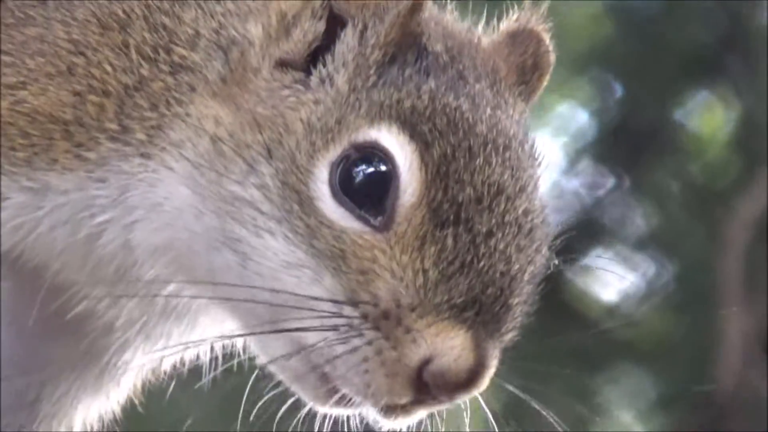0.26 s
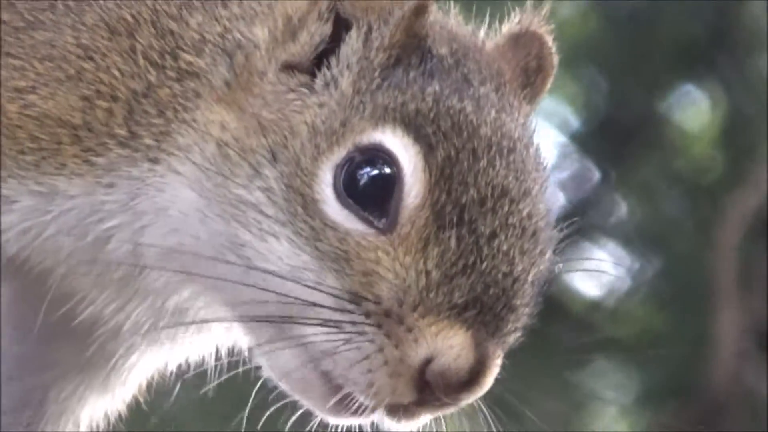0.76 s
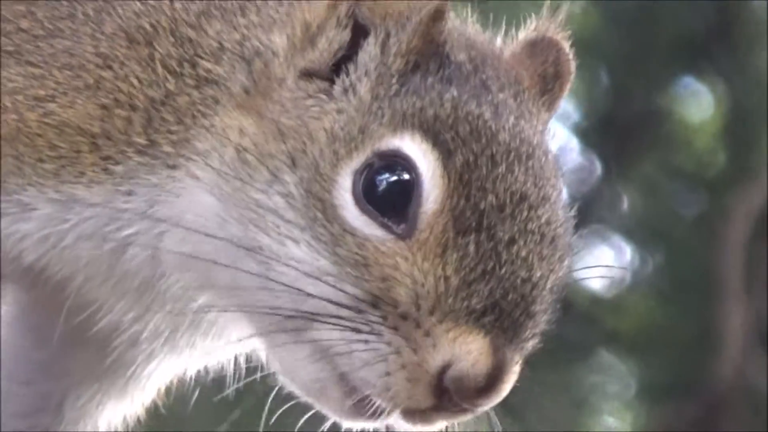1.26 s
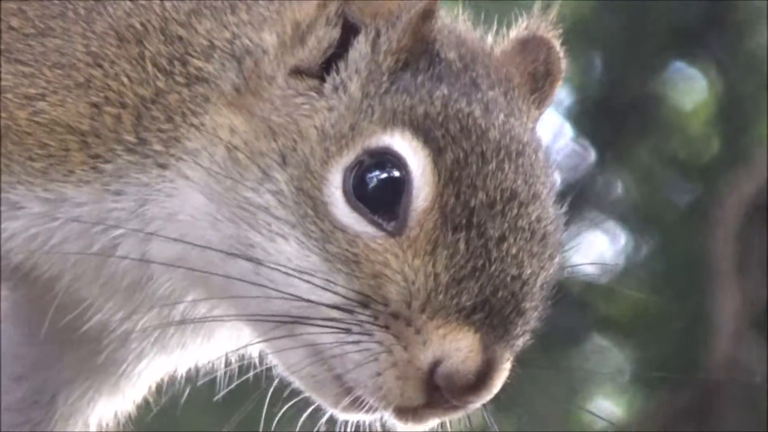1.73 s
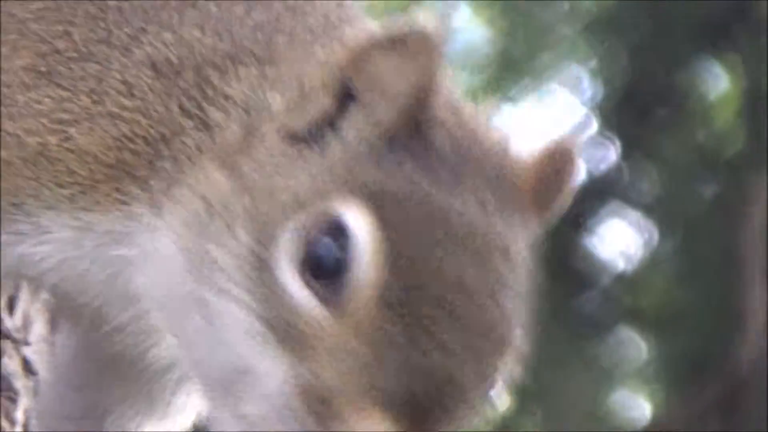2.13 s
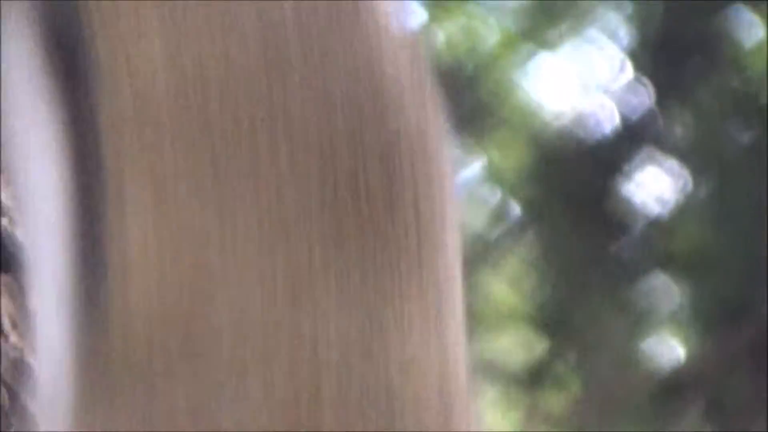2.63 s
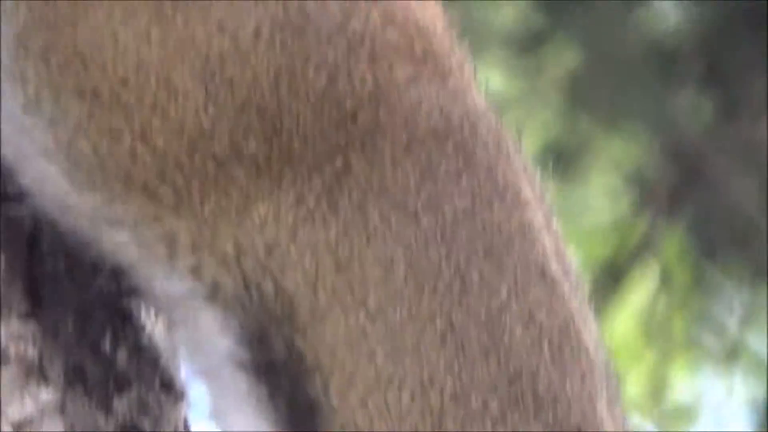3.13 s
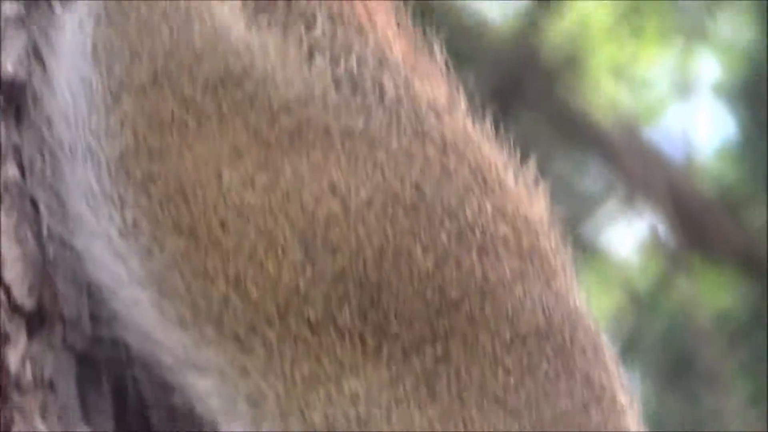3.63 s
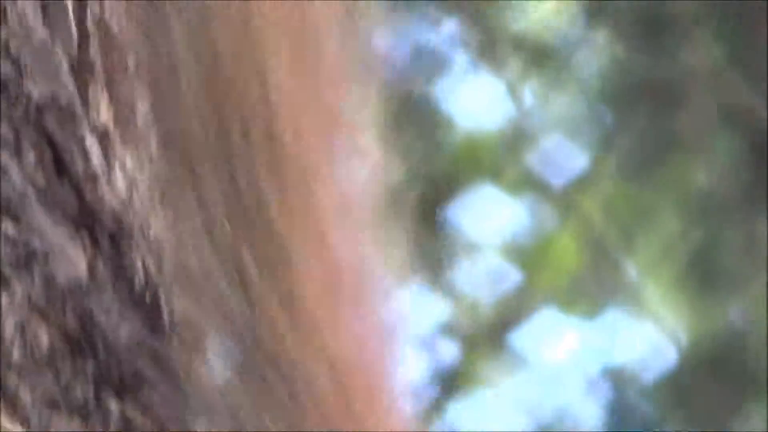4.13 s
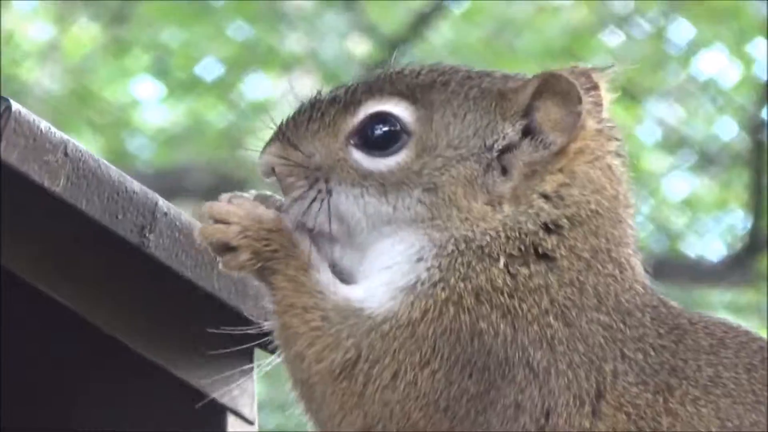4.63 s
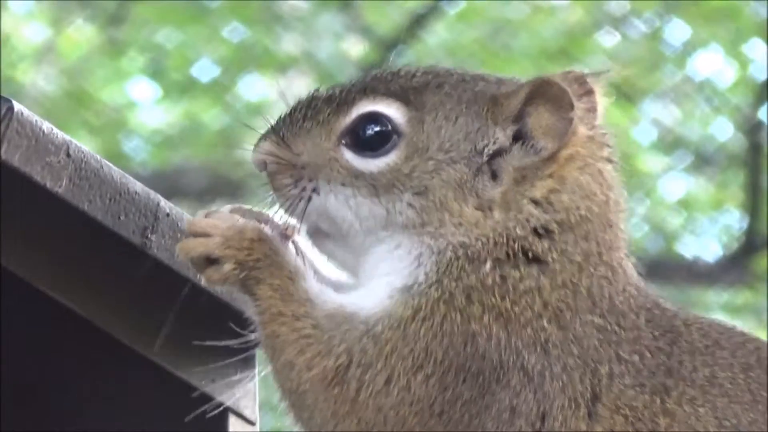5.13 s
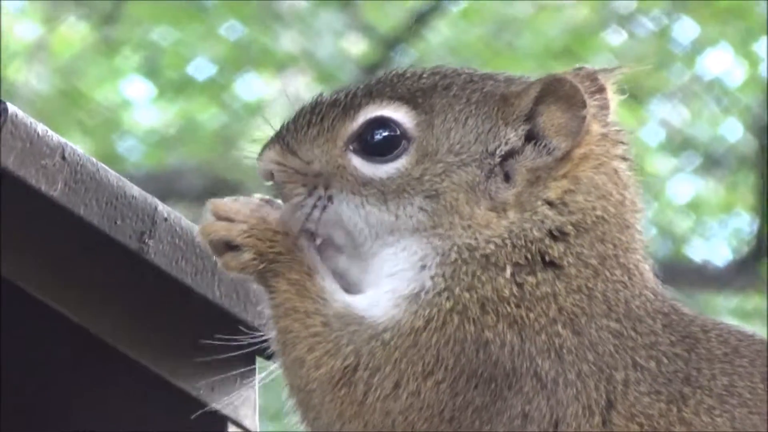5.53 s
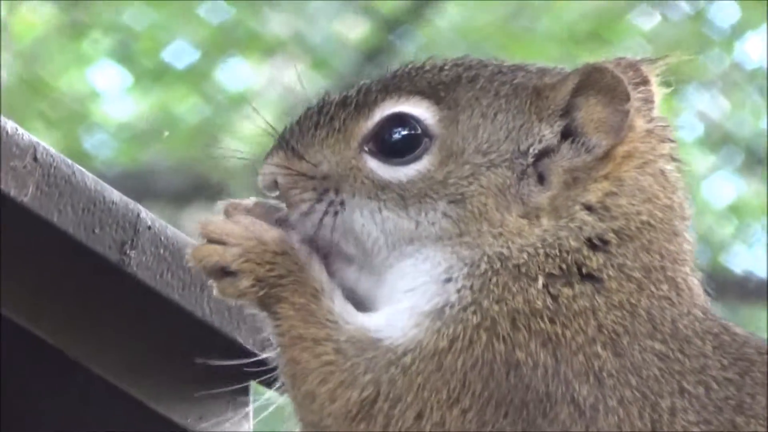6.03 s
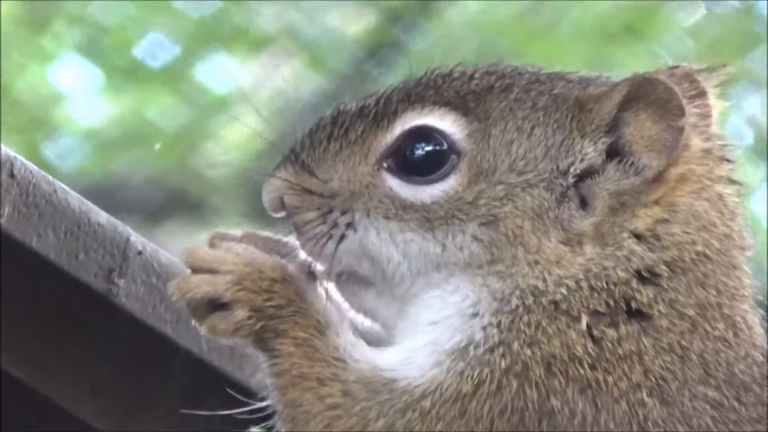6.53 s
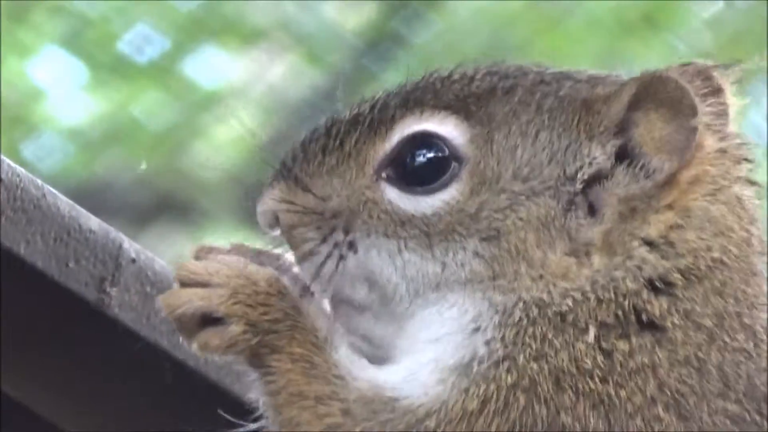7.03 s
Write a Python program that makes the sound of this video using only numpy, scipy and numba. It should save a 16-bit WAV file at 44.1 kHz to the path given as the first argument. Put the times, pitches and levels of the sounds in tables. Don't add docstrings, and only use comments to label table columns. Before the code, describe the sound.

Outdoors among trees, a red squirrel scolds very close to the microphone: three spaced piercing chirps, then five quicker ones, each a tiny whistle with a rough rasping tail and a faint echo. Dry clicks of teeth and claws fall between. A steady low motor hum and distant traffic continue beneath. After a momentary silence, a nutshell snaps and three softer, lower squeaks follow.

```python
import sys
import numpy as np
from scipy import signal
from scipy.fft import rfft, irfft, next_fast_len
from scipy.io import wavfile
from scipy.ndimage import uniform_filter1d, minimum_filter1d, map_coordinates
from numba import njit

SR = 44100
rng = np.random.default_rng(int(sys.argv[2]) if len(sys.argv) > 2 else 0)


def bounce(signal):
    frames = np.transpose(np.atleast_2d(signal))
    limited = np.clip(frames, -1, 1)
    pcm = np.round(limited * 32767).astype(np.int16)
    wavfile.write(sys.argv[1], SR, pcm)


def gain_from_decibels(decibels):
    exponent = np.asarray(decibels, float) / 20
    return 10 ** exponent


N = 321048


def unit(x):
    return x / np.sqrt(np.mean(x ** 2) + 1e-20)


def along(points, hz):
    f, v = np.transpose(points)
    return np.interp(np.log(hz + 1), np.log(f + 1), v)


def curves(rows):
    s, *cols = np.transpose(rows)
    return [np.interp(np.arange(N) / SR, s, c) for c in cols]


def wobble(rate, size):
    coarse = np.arange(0, size + SR / rate, SR / rate / 16)
    knots = rng.standard_normal(int(size * rate / SR) + 4)
    return np.interp(np.arange(size), coarse, map_coordinates(knots, [coarse * rate / SR]))


def filtered(x, response):
    m = next_fast_len(x.shape[-1] + 8192)
    return irfft(rfft(x, m) * response(np.fft.rfftfreq(m, 1 / SR)), m)[..., :x.shape[-1]]


def resonances(modes):
    def mode(f, centre, width):
        return 1j * f * width / (centre * centre - f * f + 1j * f * width)
    return lambda f: sum((-1) ** k * gain_from_decibels(db) * mode(f, c, w) for k, (c, w, db) in enumerate(modes))


def add(out, s, sound):
    out[round(s * SR):][:len(sound)] += sound


# f/Hz, left-right likeness 0-1
COHERENCE = [(60, 1.0), (130, 1), (290, 1), (640, 0.9498), (1410, 0.52), (3100, 0.302), (6820, 0.87),
             (15000, 1.0)]


def rush(spectrum, patchy_db):
    z = signal.stft(rng.standard_normal((2, N)), nperseg=512)[2]
    field = uniform_filter1d(rng.standard_normal(z.shape[1:]), 6, 0)
    field = uniform_filter1d(field, 14, 1)
    pair = signal.istft(z * gain_from_decibels(patchy_db * unit(field)), nperseg=512)[1][:, :N]

    def response(hz):
        turn = np.arccos(np.clip(along(COHERENCE, hz), -1, 1 - 1 / 1500)) / 2
        return gain_from_decibels(along(spectrum, hz)) * [np.cos(turn), np.sin(turn)]
    mid, side = filtered(pair, response)
    return unit(np.array([mid + side, mid - side]))


# f/Hz, level/dB per Hz
DEEP_SPECTRUM = [(20, -42), (35, -18), (50, -3), (90, -1), (130, -4.5), (200, -39)]
RUMBLE_SPECTRUM = [(80, -18), (130, -6.5), (250, -7), (350, -2), (460, -9.5), (700, -10.5), (900, -47.5)]
WASH_SPECTRUM = [(290, -30), (500, -4), (627, -14.5), (721, -13.5), (793, -12.5), (2800, -30.5),
                 (4000, -38.5), (5200, -73.5), (8800, -120)]
# t/s, level/dB
TRAFFIC_SWELL = [(0, -38.5), (.6, -38), (1.5, -38.5), (2, -36), (2.3, -38), (3.2, -36), (4.2, -39.5),
                 (4.52, -36), (4.75, -35.5), (5.35, -36.5), (6.1, -35), (7.28, -36)]


def traffic():
    wash_db, = curves(TRAFFIC_SWELL)
    swell_db = wash_db - wash_db.mean()
    deep = gain_from_decibels(-38 + .4 * swell_db) * rush(DEEP_SPECTRUM, patchy_db=1.8)
    rumble_db = -33.5 + 2 * swell_db + 1.3 * wobble(2.99, N)
    rumble = gain_from_decibels(rumble_db) * rush(RUMBLE_SPECTRUM, patchy_db=0.5)
    return deep + rumble + gain_from_decibels(wash_db + 2.5) * rush(WASH_SPECTRUM, patchy_db=2.0)


# f/Hz, level/dB
LEAF_SPECTRUM = [(1470, -53), (2500, 0), (3660, 0), (4620, 2.5), (5230, -1.5), (7770, -7), (12300, -9),
                 (13600, -28.5), (16000, -15.5)]


def leaves():
    return gain_from_decibels(-48 + 1.0 * wobble(2.2, N)) * rush(LEAF_SPECTRUM, patchy_db=1.6)


# f/Hz, width/Hz, level/dB
INSECT_BAND = (4700, 300, -63)


def insects():
    hz, width, db = INSECT_BAND
    spectrum = [(hz - 3 * width, -40), (hz, 0), (hz + 3 * width, -40)]
    return gain_from_decibels(db + 3 * wobble(2.5, N)) * rush(spectrum, patchy_db=2)


def line(hz, width, fuzz_share=0.82):
    noise = rng.standard_normal(N)
    fuzz = unit(filtered(noise, lambda f: 1 / (1 + ((f - hz) / width) ** 2)))
    core = np.sin(2 * np.pi * hz * np.arange(N) / SR + 0.84 * wobble(3.0006, N))
    return unit(fuzz_share * fuzz + core)


# f/Hz, width/Hz, fuzz share
MACHINE_LINES = [(323.5, 7.3, 0.28), (519.1, 6.4, 0.61), (1039, 18, 0.26)]
# f/Hz, width/Hz, level/dB
COMB_LINES = [(154.7, 13, -5.5), (192.9, 8.7, -9), (235.5, 3.3, -8), (278.1, 23, -0.5), (379.8, 15, 0),
              (421.8, 11, 0), (563.4, 4.1, -8.5), (713.5, 4.2, -13), (752, 6.4, -12.5), (1340, 6, -17.5)]
# t/s, motor level/dB, fan level/dB
MACHINE_LEVELS = [(0, -38.5, -41), (.25, -37, -35), (.9, -37, -34.5), (1.35, -38, -37.5), (1.9, -33.5, -45),
                  (2.3, -38, -48), (2.7, -35.5, -45.5), (3.3, -34, -40.5), (3.6, -34, -57),
                  (3.8, -34.5, -39), (4.3, -36, -46), (4.7, -34, -34.5), (5.15, -35, -36),
                  (5.35, -37, -41.5), (5.7, -31.5, -32), (6.3, -34.5, -39.5), (6.65, -31, -38),
                  (7.28, -33, -40)]


def drone():
    motor_db, fan_db = curves(MACHINE_LEVELS)
    motor, fan, whine = (line(*row) for row in MACHINE_LINES)
    comb = sum(gain_from_decibels(db + 1.54 * wobble(3.03, N)) * line(hz, width) for hz, width, db in COMB_LINES)
    engine = gain_from_decibels(motor_db) * (gain_from_decibels(3.5) * motor + gain_from_decibels(-3.5) * comb)
    return engine + gain_from_decibels(fan_db + 4.0) * fan + gain_from_decibels(-49 + 1.4 * wobble(1.5, N)) * whine


# f/Hz, decay time t60/s
TREE_DECAY = [(1000, .4), (3000, 1.3), (5000, 0.87), (10000, 0.4), (15000, .25)]


def trees(x):
    hz, t, z = signal.stft(rng.standard_normal((2, SR)), SR, nperseg=256)
    far_decay = gain_from_decibels(-60 * t / along(TREE_DECAY, hz)[:, None])
    near_decay = 5.5 * gain_from_decibels(-60 * t / .26)
    shared, apart = signal.istft(z * (far_decay + near_decay), SR, nperseg=256)[1]
    apart = filtered(apart, lambda f: 1.3 / (1 + f / 6000))
    tails = np.array([shared + apart, shared - apart]) / np.linalg.norm(shared)
    delayed = np.pad(x, (200, 0))[None]
    return signal.fftconvolve(delayed, tails, axes=1)[:, :N]


def clicks(rows, spread, t60, tail_db, gain_db):
    out, t = np.zeros(N), np.arange(SR // 40) / SR
    for s, db, hz in rows:
        push = (t == 0) + gain_from_decibels(tail_db - 60 * t / t60) * rng.standard_normal(len(t))
        snap = filtered(push, resonances([(hz, spread * hz, 0)]))
        add(out, s, gain_from_decibels(db + gain_db) * snap / abs(snap).max())
    return out


# t/s, peak level/dB, f/Hz
CLAW_HITS = [
    (1.3974, -20.5, 1860),
    (3.6474, -21, 1750),
    (3.9505, -28, 1650),
    (4.0854, -31, 1606),
    (5.45, -28, 2420),
    (5.685, -27, 1419),
    (6.4684, -34, 1390),
]


def claws():
    return clicks(CLAW_HITS, 0.21, 0.025, 3, 1.5)


# t/s, peak level/dB, f/Hz
TOOTH_TICKS = [(0.0591, -25.5, 9730), (0.3262, -37.5, 10200), (2.6811, -11.5, 11000), (2.6904, -8.5, 11700),
               (2.7173, -14.5, 9190), (2.7205, -25.5, 9750), (2.9656, -19, 9720), (3.0336, -3.5, 9700),
               (3.0714, -32, 10100), (3.5085, -4.5, 10700), (3.52, -17, 10200), (3.8594, -8.5, 9700),
               (3.8729, -19, 9600), (4.2808, -25, 11600), (4.3588, -32.5, 11900), (4.684, -37, 11500),
               (4.9477, -33, 9900), (4.9617, -32.5, 10700), (5.4035, -30, 11200), (5.5804, -28, 6150),
               (6.152, -29, 11000), (6.4666, -27, 11700), (6.4764, -32.5, 11200), (6.4944, -29, 10900),
               (6.5065, -30.5, 10740), (6.6543, -38, 10900)]


def teeth():
    return clicks(TOOTH_TICKS, 0.83, .008, -7.5, 5.8)


# t/s, peak level/dB, f/Hz
SHELL_CRACK = [
    (4.8474, -1, 10000),
]


def nutshell():
    return clicks(SHELL_CRACK, 0.43, 0.0063, -8, 0)


# t/s, length/s, level/dB, mouth opening 0-1, treble level/dB
RASP_EVENTS = [(0.438, 0.053, -9, 0.26, -3), (1.151, 0.042, -8.5, 0.18, -4), (2.202, 0.046, -13, 0.46, 1.2),
               (2.651, 0.042, -25, 0.2, -4), (3.018, 0.023, -25, .95, -13), (3.499, 0.022, -23, 0.54, -8),
               (3.845, 0.035, -26.5, 0.65, -4.5), (4.166, 0.038, -27, 0.62, -0.5),
               (5.103, 0.0124, -23, 0.7, -9), (5.129, 0.021, -8.5, 0.6, -5), (6.197, 0.032, -12, 0.98, -2),
               (6.884, 0.023, -9, 0.9, -2.7)]
# f/Hz, width/Hz, level/dB
SHUT_MOUTH = [(1286, 340, -17.5), (2850, 240, 1), (3796, 4700, -9), (5900, 340, -3.5), (8700, 1170, -0.5),
              (11700, 1160, 4.5), (14900, 3200, -28)]
OPEN_MOUTH = [(1100, 720, -9), (2630, 320, -0.5), (3560, 1030, -3), (6320, 600, -2.5), (8660, 2700, -19.5),
              (11000, 1035, 1), (14000, 1600, -29)]
# f/Hz, width/Hz, level/dB
NASAL_BRANCH = [(2200, 1200, 3)]


def rasps():
    lead_s, tail_s = .014, 0.033
    leak, split_hz = .17, 7200
    out = np.zeros(N)
    for s, length, db, opening, treble_db in RASP_EVENTS:
        n = round((lead_s + length + tail_s) * SR)
        u = (np.arange(n) / SR - lead_s) / length
        share = np.clip(opening, 0, 1)

        gaps, sizes = rng.standard_normal((30, 2)).T
        starts = np.cumsum(np.exp(.35 * gaps)) / (110 + share * (330 - 110))
        starts = starts - starts[0]
        since = np.maximum(u * length - starts[:, None], 0)
        life = 0.0033 * (1 - 0.79 * share)
        heights = gain_from_decibels(9.5 + 2 * sizes) * (starts < length)
        clumps = heights @ ((1 - np.exp(-since / 0.00041)) * np.exp(-since / life))

        flaps = np.cumsum(620 * gain_from_decibels(3.5 * wobble(300, n))) / SR
        fade = gain_from_decibels(db - 4.5 - 7.5 * np.minimum(u, 1))
        tail = gain_from_decibels(-21 * np.maximum(u - 1, 0) * length / tail_s)
        push = fade * (np.clip(6 * u, leak, 1) + clumps) * tail

        def mouth(f):
            modes = (1 - share) * resonances(SHUT_MOUTH)(f) + share * resonances(OPEN_MOUTH)(f)
            return modes * (1 - (1 - share) * resonances(NASAL_BRANCH)(f))

        throat = (0, 1.1, lambda f: f < split_hz)
        treble = (treble_db, .3, lambda f: f >= split_hz)
        for gain_db, steady, band in (throat, treble):
            gate = gain_from_decibels(3.1 * wobble(350, n)) * (steady + np.exp(-4 * (flaps % 1)))
            breath = unit(gate * rng.standard_normal(n)) * push
            sound = filtered(np.pad(breath, (0, 400)), lambda f: mouth(f) * band(f))
            add(out, s - lead_s, gain_from_decibels(16.5 + gain_db) * sound)
    return out


def arch(length, start_hz, crest_hz, end_hz, bend):
    u = np.linspace(-1, 1, round(length * SR))
    return crest_hz + (np.where(u < 0, start_hz, end_hz) - crest_hz) * abs(u) ** bend


def slide(length, start_hz, end_hz):
    return arch(length, start_hz, (start_hz + end_hz) / 2, end_hz, 0.59)


def pure(k, hz):
    return gain_from_decibels(-20 * (k - 1)) + 0 * hz


# f/Hz, level/dB
THROAT_RESPONSE = [(2000, 3), (2800, 1.5), (3500, 7), (5500, 1), (7200, -12.5), (9000, 10), (11500, 9.5),
                   (14500, -13), (17000, -26)]


def chest(tilt_db, second_db=0):
    def gains(k, hz):
        level_db = along(THROAT_RESPONSE, hz) + tilt_db * (k - 2) + second_db * (k == 2)
        return gain_from_decibels(level_db) * (hz < 20000)
    return gains


def note(pitch, gains, swell_db=0, attack=0.0012, fall=0.0014, scoop=0, waver_hz=0, half_db=-60,
         air_db=-32, flutter_db=1.07, fray_db=-60):
    n = len(pitch)
    t, length = np.arange(n) / SR, n / SR
    u = 2 * t / length - 1
    pitch = pitch + waver_hz * np.sin(2 * np.pi * (t / 0.0358 - .25))
    dip = np.exp(-t / 0.001) + 0.68 * np.exp((t - length) / 0.0016)
    pitch = pitch * (1 - scoop * dip + wobble(126.7, n) / 400)
    phase = 2 * np.pi * np.cumsum(pitch) / SR
    breath = np.sin(np.pi / 2 * np.clip(np.minimum(t / attack, (length - t) / fall), 0, 1))
    tone = np.zeros(n)
    for k in range(1, 7):
        flutter = gain_from_decibels(flutter_db * (k + 1) * wobble(130, n))
        overtone = np.cos(k * phase + .7 * (k - 1) ** 2)
        tone += gains(k, k * pitch) * breath ** (k - 1) * flutter * overtone
    half = gain_from_decibels(half_db) * (u > -.3) * sum(np.cos((k + .5) * phase) for k in range(3))
    air = gain_from_decibels(air_db) * (1 + np.cos(phase)) * rng.standard_normal(n)
    fray = 1 + gain_from_decibels(fray_db) * np.clip((t - .022) / 0.035, 0, 1) ** 2 * wobble(2400, n)
    return (unit(tone) * fray + half + air) * breath ** 1.25 * gain_from_decibels(swell_db * np.minimum(u, 0))


# t/s, length/s, start f/Hz, end f/Hz, level/dB
PEEP_EVENTS = [
    (0.47, 0.0102, 5530, 5250, -8),
    (1.181, 0.0063, 5410, 5180, -10),
    (2.229, 0.0043, 5786, 4720, -10),
    (2.233, 0.0057, 5116, 5500, -9),
]


def peeps():
    out = np.zeros(N)
    for s, length, start_hz, end_hz, db in PEEP_EVENTS:
        pitch = slide(length, start_hz, end_hz)
        add(out, s, gain_from_decibels(db) * note(pitch, pure, attack=0.00123, fall=0.0029))
    return out


# t/s, f/Hz, level/dB, tilt/dB per overtone
SQUEAK_CURVES = [
    [(5.082, 2634, -16, -3), (5.089, 2820, -1.5, -1.5), (5.098, 3230, -6, 2.7), (5.1005, 3550, -10.5, -3),
     (5.108, 3470, -8, -4), (5.1092, 2850, -2, -3.5), (5.1175, 2520, -5, -4)],
    [(6.156, 2910, -22, -6), (6.164, 2855, -16, -11), (6.167, 2852, -7, -5), (6.178, 2850, -9.5, -4),
     (6.186, 2610, -5, -7.5), (6.19, 2450, -9, 0)],
    [(6.833, 2610, -21, -3.5), (6.837, 2900, -16, 1), (6.8395, 2780, -24, -1), (6.842, 2730, -9, -3),
     (6.849, 2964, -7.5, -8), (6.857, 3033, -6, -3.5), (6.866, 2790, -7, -1.5), (6.871, 2730, -7.5, -13),
     (6.877, 2500, -13, -4)],
]


def squeaks():
    out = np.zeros(N)
    for rows in SQUEAK_CURVES:
        span = slice(round(rows[0][0] * SR), round(rows[-1][0] * SR))
        pitch, db, tilt_db = (c[span] for c in curves(sorted(rows)))
        voice = note(pitch, chest(tilt_db), attack=0.0013, fall=0.0013, air_db=-22.5, flutter_db=1.12)
        add(out, rows[0][0], gain_from_decibels(db) * voice)
    return out


# t/s, length/s, start f/Hz, crest f/Hz, level/dB
WHISTLE_EVENTS = [
    (0.405, 0.02145, 4370, 5127, -3),
    (1.117, 0.02, 4630, 5054, -5),
    (2.169, 0.024, 4700, 5060, -5.5),
    (2.604, 0.074, 4755, 4840, -6),
    (2.976, 0.0405, 4816, 5023, -2),
    (3.446, 0.048, 4810, 5070, 0),
    (3.798, 0.045, 5050, 4970, -3),
    (4.115, 0.051, 4960, 5008, -1.5),
]
PIPE_OVERTONES = [0, -8.5, -31]
# lead/s, level in/dB, level out/dB
FLIP_EVENTS = [(0.004, -16, -21), (0.0058, -19, -25), (.008, -30, -28.5), (.007, -35, -41.5),
               (.005, -24, -27.5), (.005, -22, -19), (0.0081, -18, -22), (0.007, -21.5, -22.5)]
# start f/Hz, end f/Hz, swell/dB, tilt/dB per overtone, second overtone/dB
FLIP_UP = (2500, 3570, 17, 0.33, 10.2)
# start f/Hz, end f/Hz, swell/dB, tilt/dB, second overtone/dB
FLIP_DOWN = (3050, 2446, -6, -5, 10)
# lead/s, length/s, start f/Hz, end f/Hz, level/dB
BREATH_TONE = (.004, .007, 1150, 2500, -34)


def calls():
    def pipe(k, hz):
        return gain_from_decibels(PIPE_OVERTONES[k - 1]) * (hz < 20000) if k <= len(PIPE_OVERTONES) else 0 * hz

    out = np.zeros(N)
    for whistle, (lead, in_db, out_db) in zip(WHISTLE_EVENTS, FLIP_EVENTS):
        s, length, start_hz, crest_hz, db = whistle
        pitch = arch(length + .0035, start_hz, crest_hz, crest_hz - 21.7 / length, 2.48)
        waver_hz = 74.4 * (length / 0.069) ** 2.2
        tone = note(pitch, pipe, attack=0.17 * length, fall=0.24 * length, scoop=0.46,
                    waver_hz=waver_hz, half_db=-50, fray_db=-12)
        add(out, s - .0015, gain_from_decibels(db + 2.5) * tone)

        low_hz, high_hz, swell_db, *colour = FLIP_UP
        pitch = slide(lead + .002, low_hz, high_hz)
        add(out, s - lead, gain_from_decibels(in_db + 8.5) * note(pitch, chest(*colour), swell_db))

        high_hz, low_hz, swell_db, *colour = FLIP_DOWN
        pitch = slide(.005, high_hz, low_hz)
        add(out, s + length + .0015, gain_from_decibels(out_db + 5) * note(pitch, chest(*colour), swell_db))

        early, short, low_hz, high_hz, breath_db = BREATH_TONE
        tone = note(slide(short, low_hz, high_hz), pure, attack=0.00059, fall=0.0043)
        add(out, s - lead - early, gain_from_decibels(breath_db) * tone)
    return out


# start t/s, end t/s
SILENCE = (4.408, 4.503)


def scene():
    voice, rasp = calls() + peeps() + squeaks(), rasps()
    snaps = teeth() + claws() + nutshell()
    sent = gain_from_decibels(-21.5) * voice + gain_from_decibels(-18.5) * rasp + gain_from_decibels(-21.0) * snaps
    first = np.arange(N) < SILENCE[1] * SR
    echoes = first * trees(sent * first) + trees(sent * ~first)
    return voice + rasp + snaps + echoes + drone() + traffic() + leaves() + insects()


@njit
def release(need, step):
    gain = need.copy()
    for i in range(1, len(gain)):
        gain[i] = min(need[i], gain[i - 1] + step * (1 - gain[i - 1]))
    return gain


def band_limit(x):
    return signal.sosfilt(signal.butter(12, 16480, fs=SR, output="sos"), x)


def record(dry):
    need = np.minimum(1, .95 / (abs(dry).max(0) + 1e-9))
    need = minimum_filter1d(need, 45)
    gain = uniform_filter1d(release(need, 1 / (0.039 * SR)), size=22)
    x = filtered(dry * gain, lambda hz: 1 / (1 + (hz / 15590) ** 80))
    t = np.arange(N) / SR
    start, end = SILENCE
    leak = gain_from_decibels(-20 - 1000 * np.clip(t - start, 0, 1)) + gain_from_decibels(-62)
    mix = x * np.where((t > start) & (t < end), leak, 1)
    return band_limit(mix)


dry = scene()
out = record(dry)
bounce(out)
```